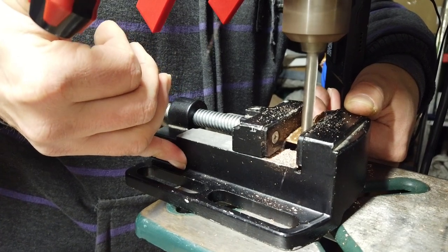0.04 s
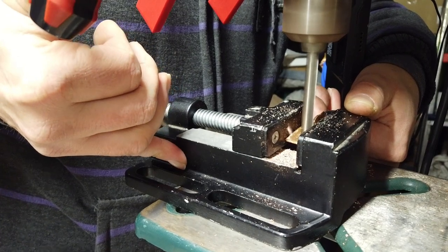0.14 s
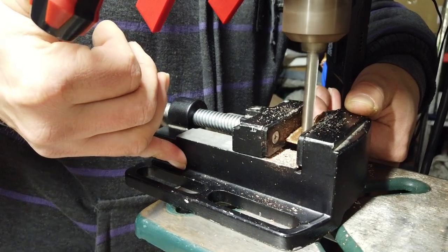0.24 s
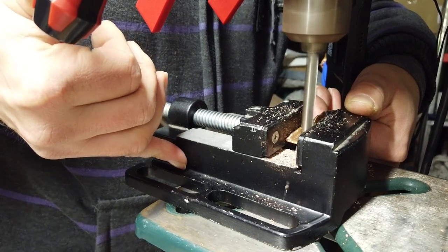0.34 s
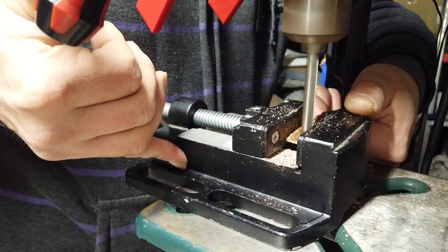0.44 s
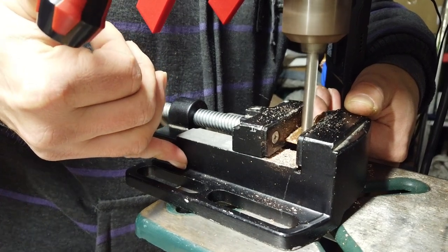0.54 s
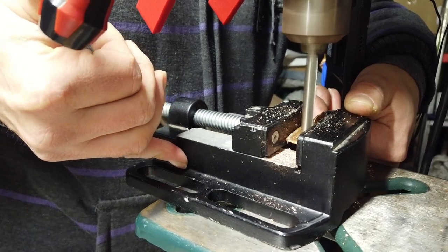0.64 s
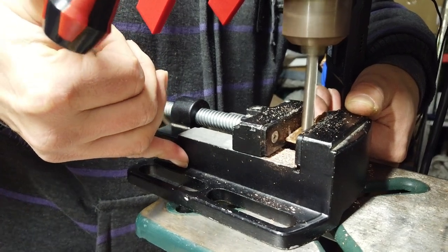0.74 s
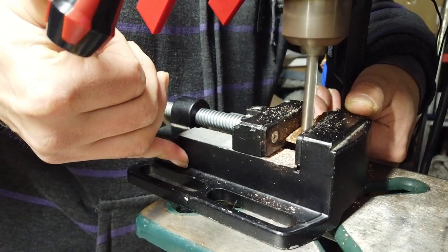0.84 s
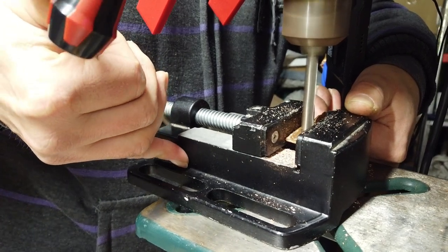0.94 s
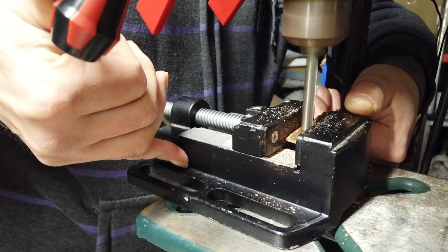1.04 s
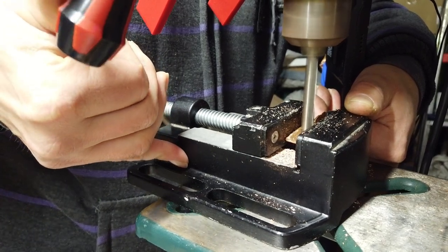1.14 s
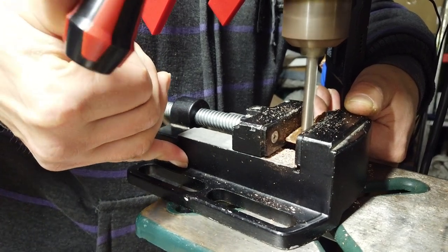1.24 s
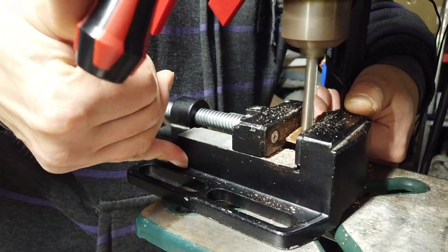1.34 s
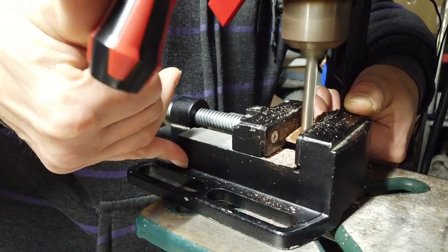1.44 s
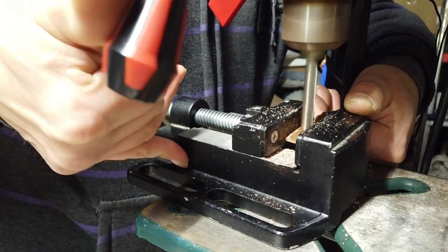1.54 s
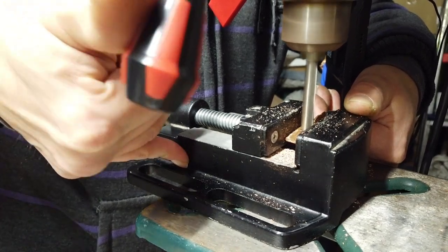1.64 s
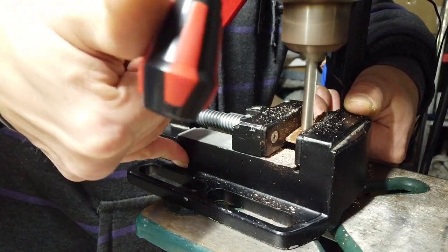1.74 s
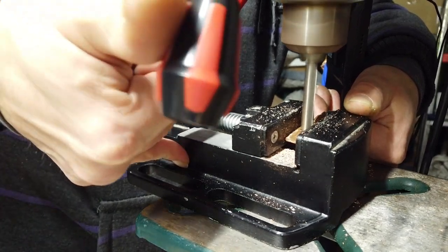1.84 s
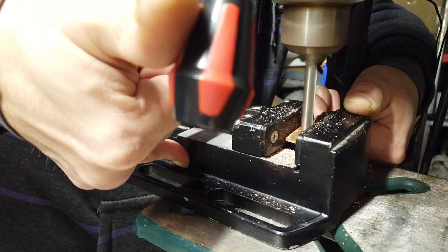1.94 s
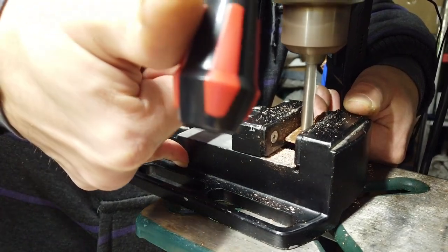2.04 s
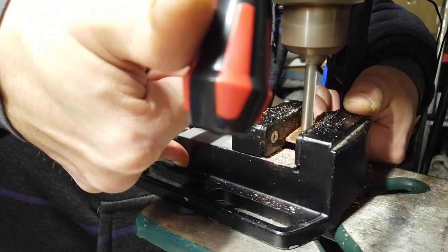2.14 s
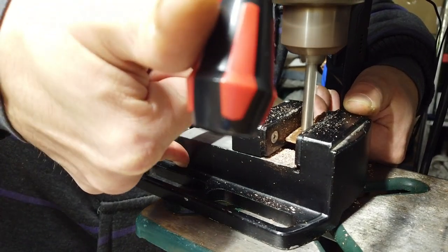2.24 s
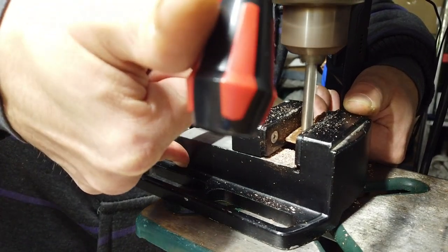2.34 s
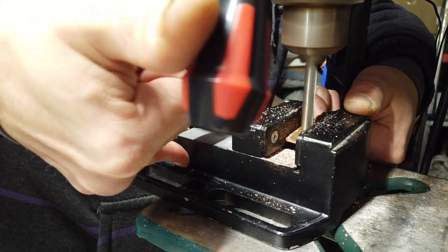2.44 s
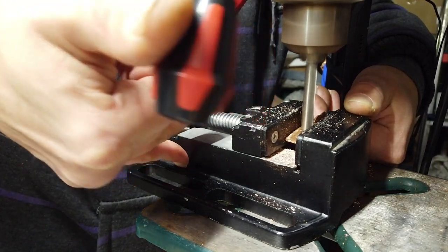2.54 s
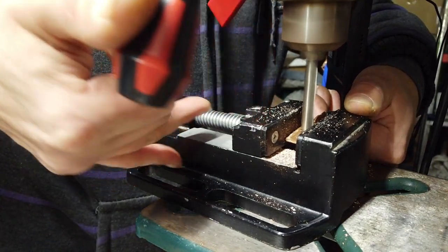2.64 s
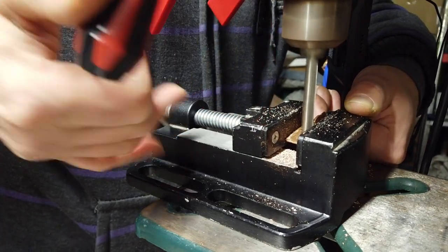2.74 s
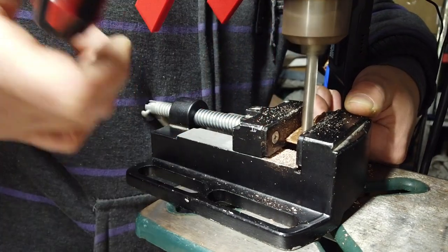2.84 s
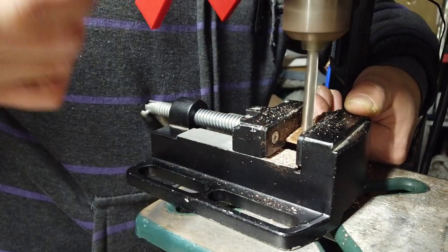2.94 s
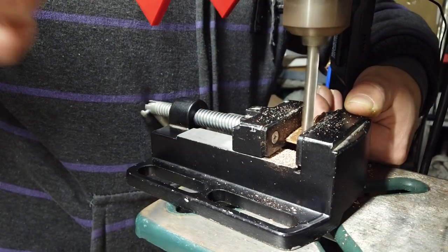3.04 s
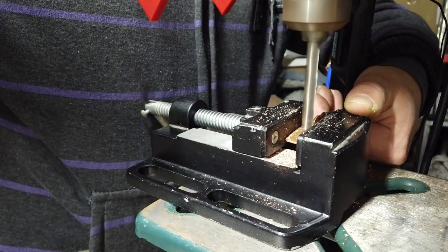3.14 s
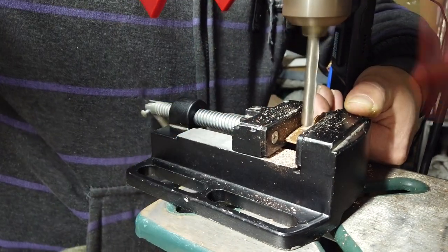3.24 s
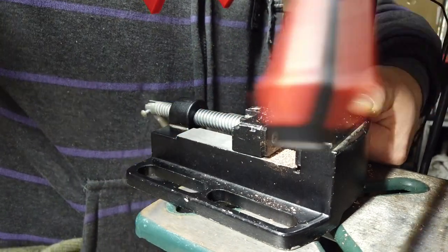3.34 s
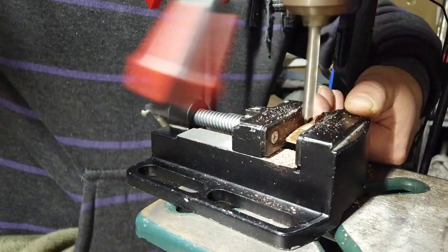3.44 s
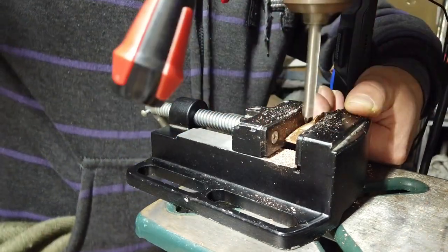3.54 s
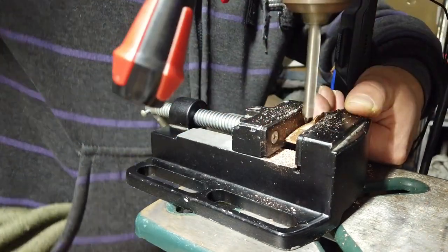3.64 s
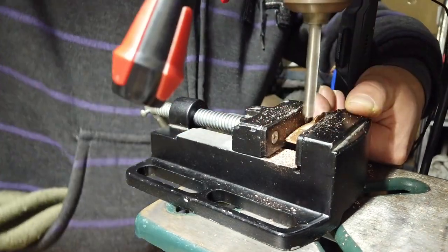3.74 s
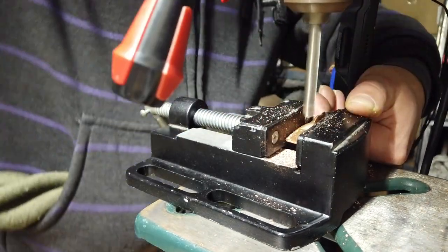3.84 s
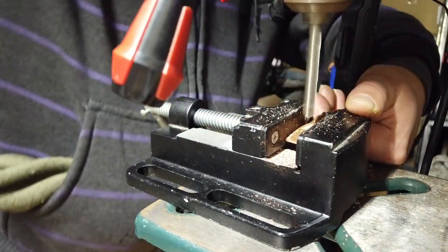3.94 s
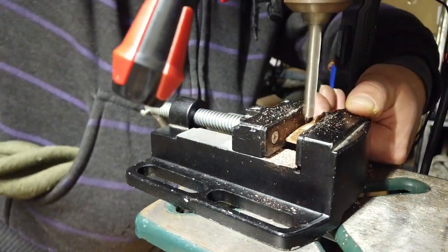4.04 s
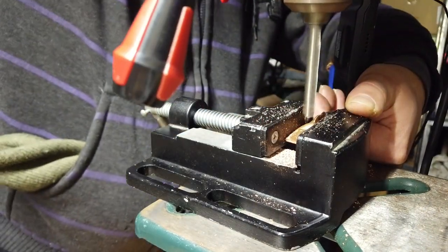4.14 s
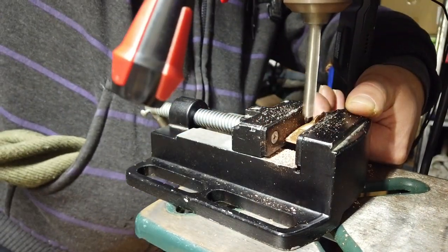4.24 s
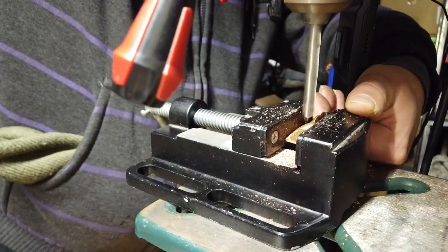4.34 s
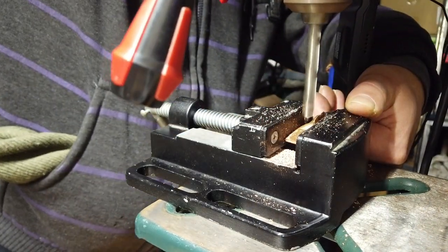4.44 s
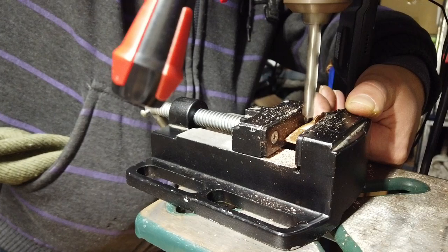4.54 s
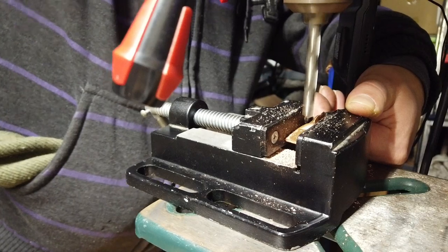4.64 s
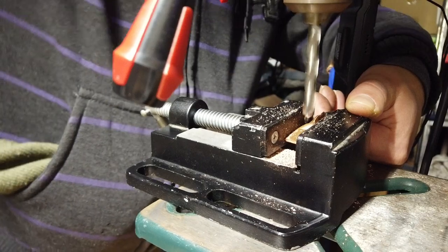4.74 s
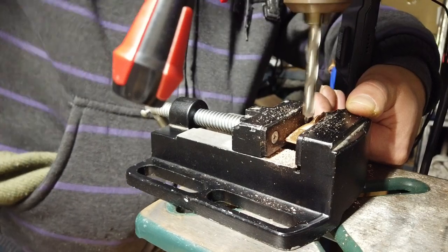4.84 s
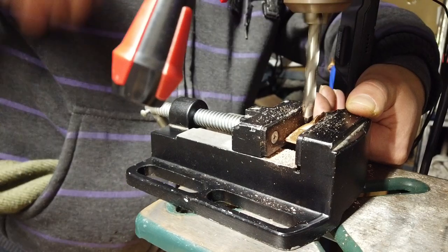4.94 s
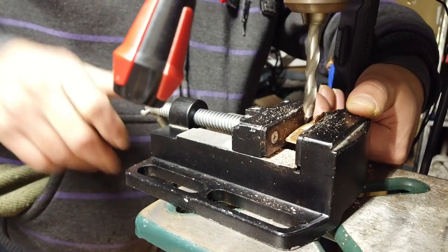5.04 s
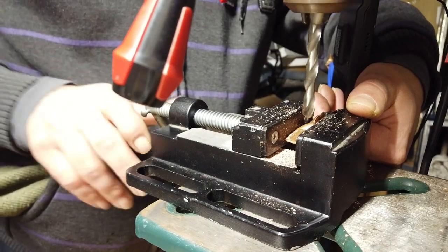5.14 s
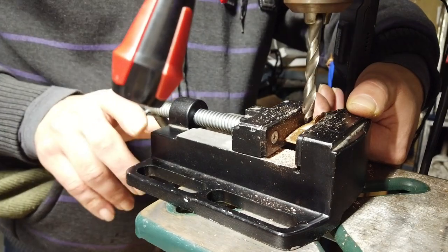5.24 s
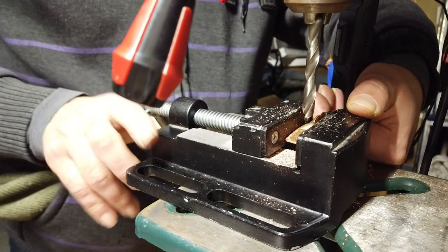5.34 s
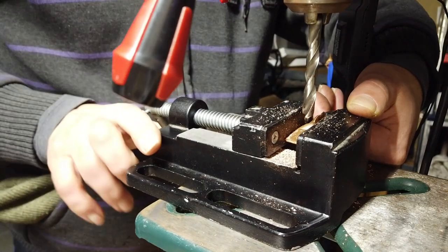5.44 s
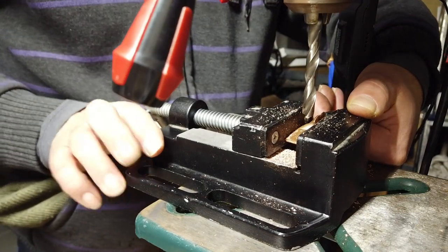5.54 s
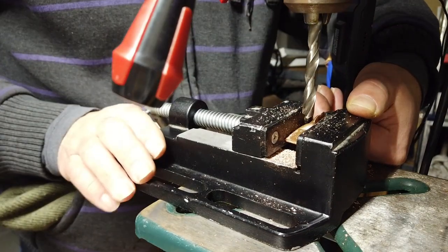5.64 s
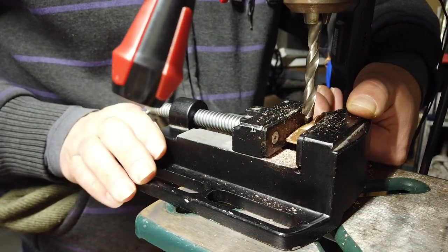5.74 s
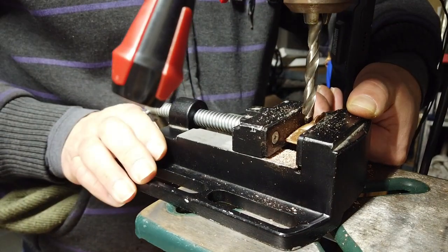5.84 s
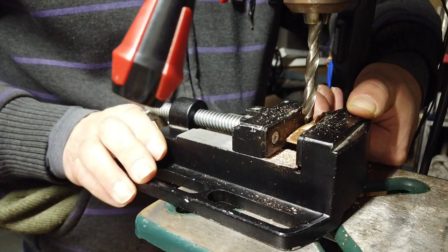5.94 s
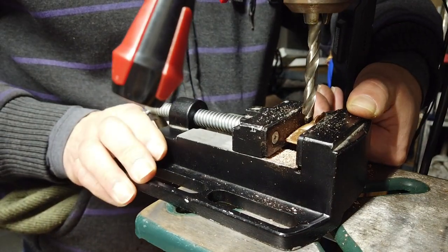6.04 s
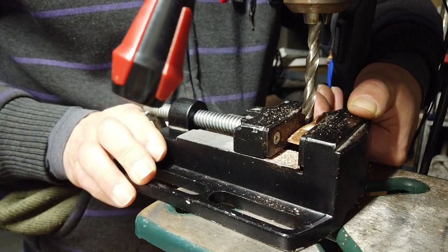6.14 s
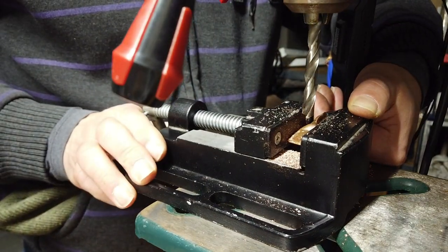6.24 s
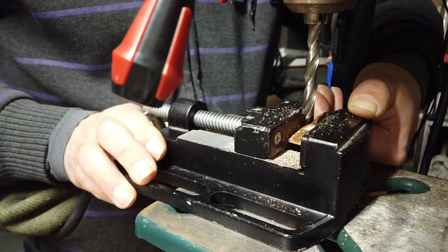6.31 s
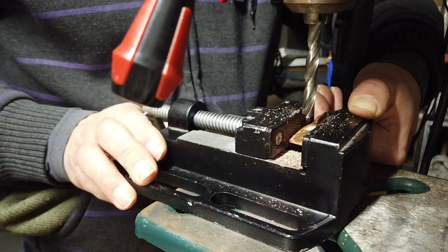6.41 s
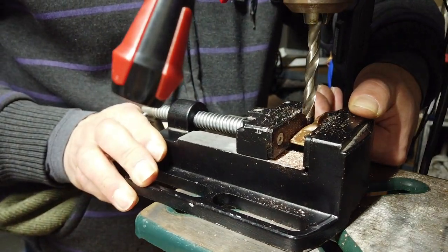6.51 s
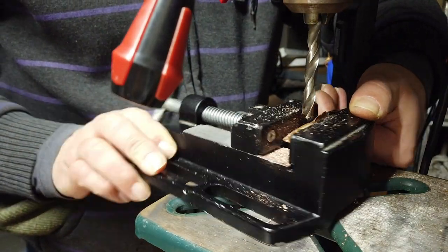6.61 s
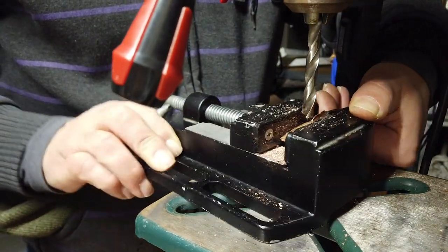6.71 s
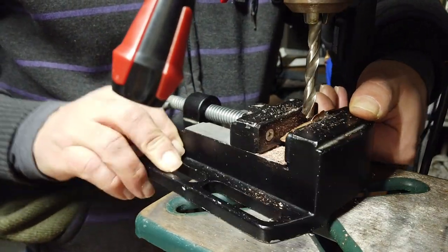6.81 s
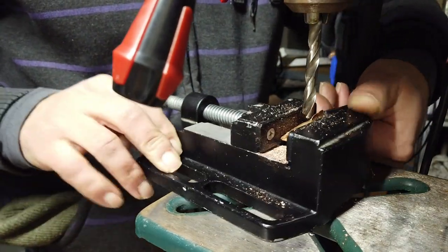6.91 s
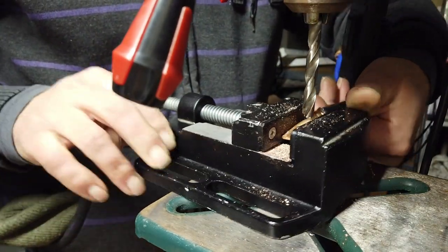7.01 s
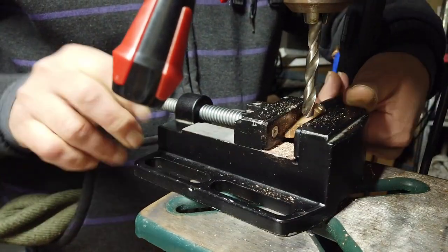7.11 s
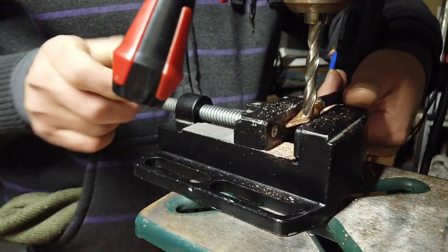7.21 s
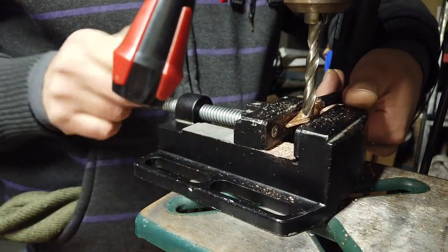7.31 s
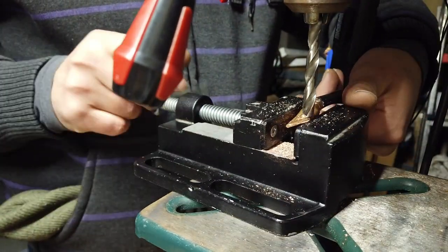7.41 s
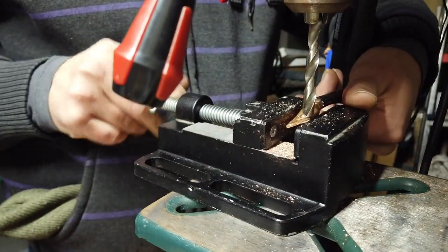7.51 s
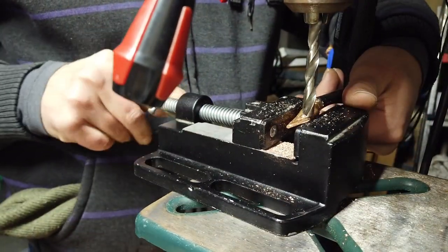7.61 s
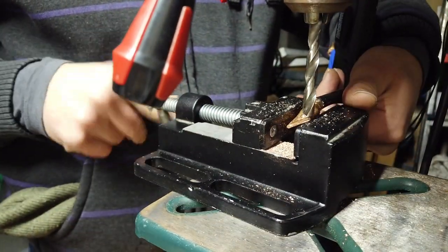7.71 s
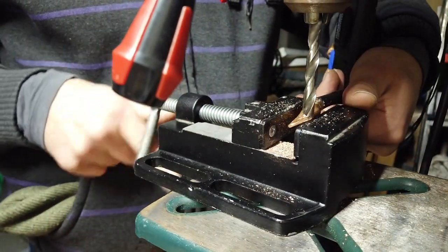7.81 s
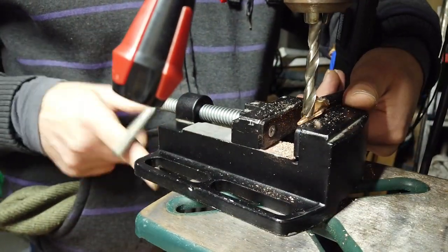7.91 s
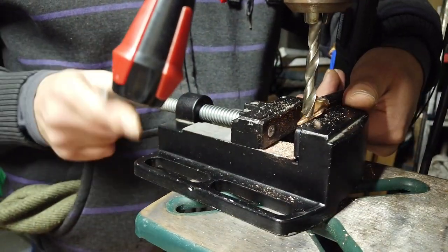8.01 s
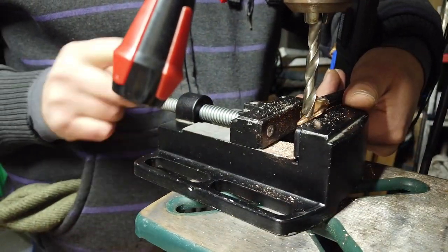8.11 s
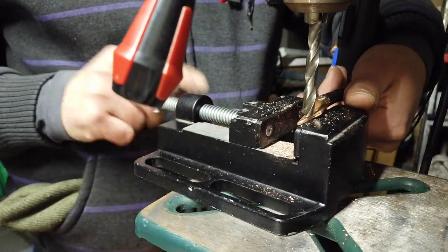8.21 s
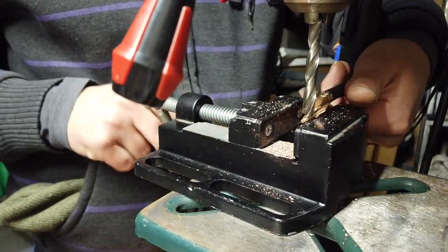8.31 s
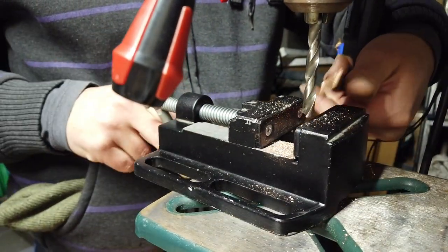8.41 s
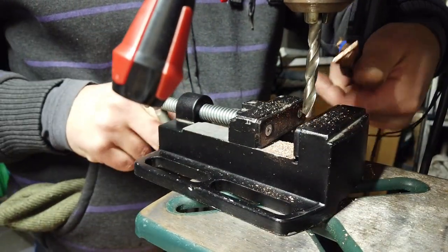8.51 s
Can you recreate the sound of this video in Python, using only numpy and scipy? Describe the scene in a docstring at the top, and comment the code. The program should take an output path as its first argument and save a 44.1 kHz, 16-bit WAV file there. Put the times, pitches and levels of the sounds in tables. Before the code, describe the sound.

A drill press rasps and squeals through copper, runs free and coasts down, then a metal vise is knocked, slid and wound with clinks.

```python
"""At a workshop bench, a drill press cuts through a copper part held in a vise, runs free, is
switched off and coasts to rest. The bit's two cutting edges, its lips, bite in turn: tearing metal
rasps and makes the bit, vise and part ring. Below that, the motor hums and its belt and bearings roar.
Then hands slide the vise, knock it on the table and wind its handle open, close by."""
import sys
import numpy as np
from scipy import signal
from scipy.io import wavfile
from scipy.ndimage import uniform_filter1d

SR = 44100
rng = np.random.default_rng(int(sys.argv[2]) if len(sys.argv) > 2 else 0)


def digitize_waveform(pressure):
    """Quantize a signal to 16-bit integers and store it at the path in sys.argv[1].

    Rows of a 2-D input are taken as channels; values are limited to [-1, 1].
    """
    field = np.atleast_2d(pressure).T
    bounded = np.clip(field, -1, 1)
    quanta = np.round(bounded * 32767).astype(np.int16)
    wavfile.write(sys.argv[1], SR, quanta)


N = 377937
T = np.arange(N) / SR
CUT_END = round(3.5 * SR)  # samples of cutting
OFF_S, REST_S = 4.44, 5.58  # the switch is thrown; the spindle stops

# Turns made by the spindle, the shaft that holds the bit; load slows it: time_s, turns
SPINDLE_TURNS = [(0, -.13), (.45, 11.97), (.8, 21.38), (1.5, 40.6), (2.1, 57.15), (2.6, 70.97),
                 (3.0, 82.17), (3.4, 93.4)]
# The machine's noise at full speed: time_s, roar_db, rumble_db
MOTOR_LEVELS = [(0.0, -47.5, -51), (0.4, -48, -63), (0.85, -47.5, -56.5), (1.1, -46.5, -64),
                (1.62, -53, -62.5), (2.0, -51, -61.5), (2.95, -48, -64.5), (3.15, -45, -63),
                (3.4, -43.5, -56), (3.55, -48, -74), (3.68, -44, -60), (4.14, -43, -60.5),
                (4.4, -43, -53.5)]
# The load shakes the bench, so left and right sound less alike: time_s, likeness_lost (0 to 1)
LOAD_SPREAD = [(0, .28), (2.95, .2), (3.2, .005)]
# The notes the iron vise rings at: pitch_hz, level_db, ring_s (time to fade by 60 dB)
VISE_NOTES = [(470, 8, .09), (690, 7, .1), (1170, 0, .08), (1430, 0, .06), (2000, -2, .06), (2420, -2, .1),
              (3016, -2, .1), (3450, -2, .12), (3640, -3, .14), (4240, -5, .08), (4850, -3, .09),
              (5630, -4, .08), (6050, -5, .05), (6900, -5, .05), (8610, -4, .06), (10380, -3, .1),
              (11250, -4, .08), (13400, -6, .05)]
# The vise bumps the table: start_s, body_db, thud_db, decay_s, pitch_hz
VISE_KNOCKS = [(6.217, -44, -46.5, 0.082, 1170), (6.404, -59, -57, 0.039, 688),
               (6.575, -57.5, -57.5, 0.066, 900), (6.702, -51, -68, 0.26, 690),
               (6.723, -32, -72, 0.079, 484), (6.742, -35, -62, 0.2, 786), (6.884, -48, -57, 0.093, 2070),
               (6.941, -49.5, -59, 0.045, 1430), (6.979, -49.5, -62, 0.07, 2000),
               (7.045, -58, -81, 0.31, 2420), (7.088, -54, -79, 0.18, 2430),
               (7.125, -47.5, -77, 0.22, 1270), (7.407, -61, -56.5, 0.48, 2100),
               (7.461, -46, -58, 0.085, 2920), (7.679, -55.5, -59, 0.076, 2420),
               (7.904, -59, -61, 0.046, 1430), (7.966, -48, -60, 0.15, 2700),
               (8.356, -53.5, -47.5, 0.088, 690)]
# Slack in the drive ticks, wider apart as it slows: start_s, body_db
DRIVE_TICKS = [(3.416, -41.5), (3.625, -38.5), (4.449, -58), (4.46, -38), (4.486, -45), (4.526, -44),
               (4.56, -44), (4.628, -53), (4.664, -58), (4.685, -42), (4.755, -44.5), (4.814, -46),
               (4.867, -50), (4.914, -42), (5.019, -46), (5.094, -61.5), (5.186, -48.5)]


def amp(db):
    """Turns decibels into a gain to multiply by."""
    return 10 ** (np.asarray(db) / 20)


def evened(x):
    """Scales a signal to an average (rms) level of 1."""
    return x / np.sqrt(np.mean(x ** 2) + 1e-20)


def wobble(span, length=N):
    """A random curve, smoothed over span samples."""
    return evened(uniform_filter1d(rng.standard_normal(length), size=span))


def at_pitch(points, hz):
    """Reads a table of (pitch_hz, value) between its rows."""
    pitches, values = np.transpose(points)
    return np.interp(np.log(hz + 1), np.log(pitches + 1), values)


def curves(rows):
    """A gate that shuts outside a table's time span, then its columns at every sample."""
    s, *columns = np.transpose(rows)
    gate = np.interp(T, [s[0] - .02, s[0], s[-1], s[-1] + .02], [0, 1, 1, 0])
    return gate, *(np.interp(T, s, column) for column in columns)


def swells(rows, rise_db_per_s, fall_db_per_s):
    """A gain that climbs to each (time_s, peak_db) and sinks after it."""
    slopes = [db - np.where(T < s, rise_db_per_s * (s - T), fall_db_per_s * (T - s)) for s, db in rows]
    return amp(np.max(slopes, axis=0))


def swings(rows, hz, ring_s):
    """A dying pure tone at each (start_s, level_db)."""
    t, kicks = np.arange(SR // 5) / SR, np.zeros(N)
    s, db = np.transpose(rows)
    kicks[np.round(s * SR).astype(int)] = amp(db)
    return signal.oaconvolve(kicks, amp(-60 * t / ring_s) * np.sin(2 * np.pi * hz * t))[:N]


def peaks(notes, db):
    """A gain by pitch, with a peak at each (pitch_hz, width_hz, level_db)."""
    return lambda hz: amp(db) * np.sqrt(
        sum(amp(2 * level) / (1 + (2 * (hz - pitch) / width) ** 2) for pitch, width, level in notes))


def iron(db):
    """The notes of the vise as peaks that colour whatever grates on it."""
    return peaks([(hz, 6 / ring_s, level) for hz, level, ring_s in VISE_NOTES], db)


def ring(x, notes):
    """Lets x shake notes (pitch_hz, width_hz, level_db); narrow ones ring longest."""
    out = 0
    for hz, width, db in notes:
        pole = np.exp((2j * np.pi * hz - np.pi * width) / SR)
        ringing = signal.lfilter([1], [1, -2 * pole.real, abs(pole) ** 2], x) * pole.imag
        out = out + amp(db) * np.sqrt(width) * ringing
    return evened(out)


def noise(colour=None, rings=None, patchy_db=0, apart=((0, 0),), size=1024):
    """Stereo noise at level 1, with drifting loud and soft patches; colour is its level by pitch."""
    # How alike left and right are: pitch_hz, likeness (0 to 1)
    likeness = [(60, 0.99), (950, 0.99), (2400, 0.81), (4500, 0.83), (8000, 0.35), (15000, .42)]
    # How far the left side is ahead: pitch_hz, lead_radians
    left_lead = [(2500, 0), (5000, 1.3), (16000, 1.5)]
    hop, hz = size // 2, np.fft.rfftfreq(size, 1 / SR)
    a, b, c, d, patches = rng.standard_normal((N // hop + 3, len(hz), 5), dtype=np.float32).T
    left, unrelated = a + 1j * b, c + 1j * d
    patches = evened(uniform_filter1d(uniform_filter1d(patches, size=8, axis=0), size=3, axis=1))
    lost = np.interp(np.arange(left.shape[1]) * hop / SR, *np.transpose(apart))
    same = np.clip(at_pitch(likeness, hz)[:, None] - lost, 0, 1)
    lag = np.exp(-1j * at_pitch(left_lead, hz))[:, None]
    right = same * left * lag + np.sqrt(1 - same ** 2) * unrelated
    gain = 1 if colour is None else amp(at_pitch(colour, hz))
    gain = gain * (1 + rings(hz) if rings else np.ones(len(hz)))
    bands = np.array([left, right]) * gain[:, None] * amp(patchy_db * patches)
    return evened(signal.istft(bands, window="cosine", nperseg=size, noverlap=hop)[1][:, :N])


def room_air():
    """The faint, steady rush of the room."""
    # Its colour: pitch_hz, level_db
    air_colour = [(12, -32), (20, -1), (56, 5), (96, -4.5), (134, -16), (204, -18), (897, -26.5),
                  (1610, -22), (2320, -27.5), (6180, -31.5), (16000, -33)]
    return amp(-74) * noise(air_colour, size=2048)


def room_echoes(x):
    """The workshop throws back scattered echoes; high pitches die first."""
    # Time for an echo to fade by 60 dB: pitch_hz, fade_s
    fade_times = [(200, .28), (1000, .24), (4000, .16), (12000, .12)]
    echoes, slots = np.zeros((2, SR // 2)), np.arange(200, SR // 2 - 20, 20)
    arrivals = slots + rng.integers(0, 20, (2, len(slots)))
    np.put_along_axis(echoes, arrivals, rng.choice([-1., 1.], arrivals.shape), 1)
    hz, t, bands = signal.stft(echoes, SR, nperseg=256)
    tail = signal.istft(bands * amp(-60 * t / at_pitch(fade_times, hz)[:, None]), SR, nperseg=256)[1]
    tail = tail + 0.41 * tail[::-1]  # each side gets some of the other
    return signal.fftconvolve(x, tail / np.linalg.norm(tail[0]), axes=1)[:, :N]


def coasting(drop_db, fade):
    """Gain of a turning part: full under power, then a quick drop and a fade with the speed."""
    speed = np.interp(T, [OFF_S, REST_S], [1, 0])
    return amp(np.interp(T, [OFF_S, OFF_S + 0.17], [0, drop_db])) * speed ** fade


def motor_roar():
    """Belt and bearings roar in the frame and the bench rumbles; both fade as the drive slows."""
    # The roar while the tip presses hard: pitch_hz, level_db
    strained_colour = [(88, -32), (150, -0.5), (200, -16), (301, -0.5), (366, -9.5), (625, -0.5),
                       (1130, -10.5), (1310, -2.5), (2300, -7.5), (2990, -30), (5060, -120)]
    # The roar once the load eases: pitch_hz, level_db
    easy_colour = [(88, -42), (150, -13.5), (413, -8.5), (500, -2), (562, -3), (623, -4), (1140, -15.5),
                   (1320, -14.5), (1620, -11), (2550, -6.5), (5000, -26), (6500, -56.5), (11000, -120)]
    # Notes of the frame: pitch_hz, width_hz, level_db
    frame_notes = [(621, 19, 6.5), (807, 53, 6), (1041.5, 21, 12), (1307, 55, 12.5), (2470, 170, -4.5)]
    # Note of the upright column: pitch_hz, width_hz, level_db
    column_note = [(788, 9.7, 0)]
    # The bench's rumble: pitch_hz, level_db
    rumble_colour = [(12, -40.5), (20, -2), (59, -6), (118, -3.5), (161, 13.5), (259, -41), (300, 9),
                     (390, -24), (660, -120)]
    _, roar_db, rumble_db = curves(MOTOR_LEVELS)
    eased = np.interp(T, [.8, 1.4], [0, np.pi / 2])
    roar = np.sin(eased) * noise(easy_colour, peaks(frame_notes, db=8), patchy_db=2, apart=LOAD_SPREAD)
    roar += np.cos(eased) * noise(strained_colour, patchy_db=2.5, apart=LOAD_SPREAD)
    dull = signal.sosfilt(signal.butter(2, 1793, fs=SR, output="sos"), roar)
    roar += (dull - roar) * (1 - coasting(drop_db=-0.76, fade=1.1))  # the treble dies faster
    roar += amp(-16.5) * ring(roar, column_note)
    rumble = noise(rumble_colour, patchy_db=3, apart=LOAD_SPREAD, size=2048)
    return coasting(drop_db=-3, fade=2.02) * (amp(roar_db) * roar + amp(rumble_db) * rumble)


def column_groans():
    """The drill's column groans in short swells of two clashing tones."""
    # Each groan: peak_s, level_db, pitch_hz
    groans = [(0.78, -57, 776), (2.585, -47, 770), (3.155, -47.5, 782), (3.34, -44.5, 768),
              (3.39, -43, 786), (3.44, -44, 729), (4.14, -59, 757), (4.36, -42, 785)]
    s, db, hz = np.transpose(groans)
    phase = 2 * np.pi * np.cumsum(np.interp(T, s, hz)) / SR
    tones = np.sqrt(2) * (np.sin(phase) + 0.37 * np.sin(1.32 * phase))
    return swells(zip(s, db), rise_db_per_s=410, fall_db_per_s=350) * tones


def belt_hiss():
    """Once the bit leaves the work, belt and bearings hiss freely."""
    # The hiss: pitch_hz, level_db
    hiss_colour = [(2060, -2), (3500, 2), (5360, -2), (9200, -3), (10100, -4.5), (13100, -15), (15100, -22),
                   (16000, -26)]
    # Faint notes of the free bit and the chuck that grips it: pitch_hz, width_hz, level_db
    chuck_notes = [(5000, 46, -4.5), (7830, 53, 5), (8500, 120, -12.5), (9800, 48, 5), (10040, 43, -8),
                   (12100, 51, -10)]
    lift_s = 3.0
    free = np.interp(T, [lift_s - .03, lift_s], [0, 1]) * coasting(drop_db=-6.5, fade=2.4)
    hiss = noise(hiss_colour, peaks(chuck_notes, db=2), patchy_db=2.5, size=512)
    return free * amp(-54 + 2.37 * wobble(150)) * hiss


def mains_hum():
    """The mains current makes the motor's coils hum."""
    # The whole hum: time_s, level_db
    hum_levels = [(0, -62), (.97, -62), (1.01, -52), (1.7, -53.5), (2.1, -55), (2.7, -55), (3.39, -50.5),
                  (4.11, -49), (4.46, -52.5), (4.6, -62)]
    # Its tones: pitch_hz, relative_db
    hum_tones = [(200, -14), (300.3, -16), (350, -15), (400, -16), (500.3, 0)]
    gate, hum_db = curves(hum_levels)
    hum = sum(amp(db) * np.sin(2 * np.pi * (hz * T + rng.random())) for hz, db in hum_tones)
    return np.sqrt(2) * gate * amp(hum_db) * hum


def spindle_shake():
    """The unbalanced spindle shakes the bench at three low, steady pitches."""
    # About one, three and four shakes a turn at full speed: pitch_hz
    pitches = [28.5, 83.3, 107]
    # Their strengths: time_s, low_db, middle_db, high_db
    levels = [(0.0, -69.5, -56.5, -65), (0.29, -57, -66, -58.5), (0.58, -90, -55, -53),
              (0.71, -73, -78, -65), (0.91, -46.5, -55, -56), (1.07, -67, -101, -89),
              (2.85, -91.5, -81.5, -77.5), (4.21, -69, -50.5, -65), (4.44, -82, -55, -85),
              (4.77, -64, -77, -83), (5.2, -71, -69, -83)]
    # How far the right side trails in each: lag_radians
    lags = [1.7, .15, .7]
    gate, *shake_db = curves(levels)
    shake = sum(amp(db) * np.sin(2 * np.pi * (hz * T + rng.random()) - np.array([[0], [lag]]))
                for hz, db, lag in zip(pitches, shake_db, lags))
    return np.sqrt(2) * gate * shake


def vise_scrape():
    """Iron rubs on iron as the vise slides and its screw turns."""
    # The scrape below and above 4 kHz: time_s, dull_db, bright_db
    scrape_levels = [(5.5, -86, -88.5), (6.05, -86.5, -97.5), (6.55, -83, -93), (6.69, -78, -87),
                     (6.82, -63.5, -82), (6.92, -68, -89), (7.09, -67.5, -70), (7.21, -66, -64),
                     (7.31, -67.5, -82), (7.53, -61.5, -78), (7.66, -72.5, -87.5), (7.88, -69, -85),
                     (8.05, -66.5, -77.5), (8.2, -66, -77), (8.31, -58.5, -79), (8.43, -58.5, -67.5),
                     (8.57, -63.5, -79)]
    # Its colour: pitch_hz, level_db
    scrape_colour = [(71, -26), (120, 16.5), (385, 1), (684, -5.5), (839, 8), (1210, -0.5), (2640, -6),
                     (3380, -10.5), (7350, -21.5), (10600, -23), (16000, -42)]
    gate, dull_db, bright_db = curves(scrape_levels)
    grit = amp(2.5 * wobble(500))
    scrape = noise(scrape_colour, iron(db=11), patchy_db=1.8)
    dull, bright = (evened(signal.sosfilt(signal.butter(4, 4000, kind, fs=SR, output="sos"), scrape))
                    for kind in ("low", "high"))
    return gate * grit * (amp(dull_db) * dull + amp(bright_db) * bright)


def bench_thumps():
    """The bench thumps at its own low note as the vise is handled."""
    # Each thump: peak_s, level_db
    thumps = [(5.85, -69.5), (6.57, -80), (6.77, -46), (7.03, -56), (7.51, -47.5), (7.87, -58), (8.14, -59),
              (8.36, -56)]
    boom = noise(colour=[(40, -50), (68, -16), (76, 11), (85, -10), (130, -64), (400, -88)], size=4096)
    return swells(thumps, rise_db_per_s=194, fall_db_per_s=140) * boom


def blows(rows):
    """Each blow is three dying bursts of noise and a ring of the vise, damped by hands and jaws.
    Rows: start_s, body_db, thud_db, fizz_db, decay_s, ring_db (above the body), pitch_hz."""
    # The low burst: pitch_hz, level_db
    thud = [(24, -35), (40, 2), (97, 2), (183, -6.5), (212, -9.5), (386, -11), (600, -21.5), (780, -35),
            (1320, -120)]
    # The middle burst: pitch_hz, level_db
    body = [(240, -5.5), (400, -18), (713, -6.5), (1000, -2), (1170, -3.5), (1310, -4.5), (2420, -3),
            (4730, -13.5), (6000, -19.5), (7800, -44.5), (13200, -120)]
    # The high burst: pitch_hz, level_db
    fizz = [(2060, -24), (3500, -8.5), (5330, -11.5), (8530, -2.5), (11000, 4.5), (11900, -6.5),
            (15500, -3), (16000, -28.5)]
    t = np.arange(SR // 5) / SR
    strength, ringing = np.zeros((3, N + SR)), np.zeros((2, N + SR))
    rattle = amp(2.5 * wobble(90, N + SR) - 1)  # loose parts chatter
    chance = rng.standard_normal((len(rows), len(VISE_NOTES), 2))
    hz, note_db, ring_s = np.transpose(VISE_NOTES)[:, :, None]
    notes = amp(note_db - 60 * t / ring_s) * np.sin(2 * np.pi * hz * t) * (1 - np.exp(-t / 0.0035))
    for (s, body_db, thud_db, fizz_db, decay_s, ring_db, pitch_hz), luck in zip(rows, chance):
        span = slice(round(s * SR), round(s * SR) + len(t))
        age = t / decay_s
        shapes = [(thud_db, 1.8, .04), (body_db, 1.05, .025), (fizz_db, .7, .03)]
        for band, (db, fall, rise) in enumerate(shapes):
            strength[band, span] += amp(db - 60 * age / fall) * (1 - np.exp(-age / rise))
        octaves_away = abs(np.log2(hz / pitch_hz))  # the spot struck favours notes near pitch_hz
        favour = amp(2.5 * luck[:, :1] - 28 * np.minimum(octaves_away / .6, 1))
        sides = 1 + 0.419 * luck[:, 1:] * [1, -1]
        damping = amp(-60 * age / 3)
        ringing[:, span] += amp(body_db + ring_db) * damping * rattle[span] * ((favour * sides).T @ notes)
    bursts = sum(gain[:N] * noise(colour, iron(db=12), size=512)
                 for gain, colour in zip(strength, [thud, body, fizz]))
    return ringing[:, :N] + bursts


def handle_clinks():
    """Rows for blows(): the steel handle clinks in its screw."""
    # Each clink: start_s, body_db, fizz_db, pitch_hz
    clinks = [(5.367, -62.5, -89, 2840), (5.634, -68.5, -69, 1520), (5.654, -69.5, -76, 3016),
              (5.683, -67, -77, 1460), (6.809, -48, -29.5, 11300), (6.852, -46.5, -48, 3180),
              (7.17, -54, -64, 2380), (7.207, -43.5, -46.5, 11800), (7.218, -39.5, -64, 1170),
              (7.247, -55, -47, 2000), (7.259, -61, -49, 3660), (7.267, -46.5, -44, 4770),
              (7.312, -49.5, -58, 2250), (7.436, -44, -46, 6400), (7.58, -54, -68, 3570),
              (7.615, -68, -85.5, 2700), (7.871, -53.5, -79, 1480), (7.99, -55.5, -62, 3450),
              (8.091, -71, -62, 4100), (8.104, -59.5, -60, 2840), (8.149, -48.5, -53, 5960),
              (8.2, -60, -57.5, 2940), (8.29, -59, -79, 2980), (8.338, -48, -59, 4670),
              (8.415, -46, -52, 3460), (8.473, -59, -71, 3020), (8.513, -50.5, -52, 4150)]
    decay_s, ring_db = .075, 9
    return [(s, db, db - 20, fizz_db, decay_s, ring_db, hz) for s, db, fizz_db, hz in clinks]


def vise_knocks():
    """Rows for blows(): the harder the vise hits the table, the brighter the knock."""
    return [(s, db, thud_db, db - 21 + .8 * (db + 45), decay_s, 0, hz)
            for s, db, thud_db, decay_s, hz in VISE_KNOCKS]


def drive_ticks():
    """Rows for blows(): the slack drive ticks, ever duller after the switch is thrown."""
    dulling_db_per_s, decay_s, ring_db, pitch_hz = 26, .07, -22, 1317
    return [(s, db, db - 5, db - 1 - dulling_db_per_s * max(s - OFF_S, 0), decay_s, ring_db, pitch_hz)
            for s, db in DRIVE_TICKS]


def lip_jams():
    """Rows for blows(): the lips jam at the rim of the hole and jolt the vise."""
    # Each jam: start_s, body_db
    jams = [(0.857, -29), (0.892, -31.5), (0.931, -37.5), (0.964, -40), (1.007, -35), (1.044, -39),
            (1.11, -29.5), (1.18, -32), (1.216, -28.5), (1.257, -31)]
    decay_s, ring_db, pitch_hz = .035, 1, 1900
    return [(s, db, db - 14, db + 2, decay_s, ring_db, pitch_hz) for s, db in jams]


def chip_snags():
    """Rows for blows(): a chip of copper snags on a lip with a bright click."""
    # Each snag: start_s, fizz_db, pitch_hz
    snags = [(0.017, -21, 2960), (0.063, -21.5, 2570), (0.2, -25, 2710), (0.237, -21, 2710),
             (0.302, -24, 2710), (0.388, -24, 2560), (0.413, -20, 2550), (0.429, -24, 2760),
             (0.58, -29, 2760), (0.644, -19, 2760), (0.719, -21, 2915), (0.765, -24, 2994),
             (0.83, -17.5, 2944), (1.459, -38.5, 3330), (1.621, -22.5, 3320), (1.967, -22.5, 2880),
             (2.003, -24, 2950), (2.038, -35.5, 3350), (2.076, -22.5, 3330), (2.111, -20.5, 2920),
             (2.136, -22, 4900), (2.203, -20, 4850), (2.328, -21.5, 6550), (2.363, -35.5, 2940),
             (2.425, -21.5, 4730), (2.675, -21, 4810), (2.951, -20.5, 2520), (2.974, -25, 6090),
             (3.007, -23.5, 2950), (3.062, -31, 2480)]
    decay_s, ring_db = .031, 4.5
    return [(s, db - 30, db - 29, db, decay_s, ring_db, hz) for s, db, hz in snags]


def bites(depth, short_lip):
    """The cutting force: each lip catches, tears for a moment and slips free; one lip is shorter."""
    through_s = .83  # the tip breaks through: three chatters a turn give way to two bites
    count = np.interp(T, *np.transpose(SPINDLE_TURNS)) * np.where(T < through_s, 3, 2)
    number, progress = np.floor(count).astype(int), count % 1
    size = np.clip(1 + .12 * rng.standard_normal(400), 0, 3)[number % 400]
    size *= 1 - short_lip * ((number + 1) % 2)
    catch = .72 * size * (1 - np.exp(-progress / .12)) * np.exp(-(progress / .25) ** 2)
    force = amp(depth * catch + wobble(120))
    return force / np.sqrt(uniform_filter1d(force ** 2, size=4000))


def vise_growl(jolts):
    """The jolted vise growls lower under the pressing tip than under the lips."""
    # Its notes under the tip: pitch_hz, width_hz, level_db
    tip_notes = [(2604, 55, 2.5), (2766, 70, -11), (2816, 190, 6.5), (3580, 120, 0.5)]
    # Its notes under the lips: pitch_hz, width_hz, level_db
    lip_notes = [(2622, 80, -8.5), (2954, 60, -1.5), (3340, 86, 2), (3720, 78, -0.5)]
    deeper = np.interp(T[:CUT_END], [.9, 1.3], [0, np.pi / 2])
    return np.cos(deeper) * ring(jolts, tip_notes) + np.sin(deeper) * ring(jolts, lip_notes)


def part_chirps(jolts):
    """A kick in every turn makes the part chirp, lower once the lips cut the rim; jolts ring it too."""
    # The high and low chirp: pitch_hz, width_hz, place_in_turn (0 to 1)
    chirp_notes = [(6060, 170, 0.65), (4866, 100, .03)]
    # Their blend: time_s, blend_radians (0 = high only, 1.57 = low only)
    chirp_blend = [(1.6, .25), (2.1, 1.25), (2.45, 1.15), (2.6, .6)]
    turns, chirps = np.interp(T[:CUT_END], *np.transpose(SPINDLE_TURNS)), []
    for hz, width, place in chirp_notes:
        kicks = np.diff(np.floor(turns - place), prepend=-1) * amp(4 * rng.standard_normal(CUT_END))
        kicks = np.array([kicks, np.roll(kicks, 2)])  # the right side is two samples late
        once = ring(kicks, [(hz, width, 0)])
        chirps.append(ring(once, [(hz * 1.01, width, 0)]))  # ringing twice makes it swell
    blend = np.interp(T[:CUT_END], *np.transpose(chirp_blend))
    kicked = np.cos(blend) * chirps[0] + np.sin(blend) * chirps[1]
    return .85 * kicked + .5 * ring(jolts, [(hz, width, 0) for hz, width, _ in chirp_notes])


def bit_squeal(tearing):
    """The bit rings near 10 kHz: a flickering blur that clears while the rim of the hole grips it."""
    # The blurred ring: pitch_hz, width_hz, level_db
    blurred_notes = [(9850, 120, -6), (10120, 120, -1), (10390, 100, 0), (10500, 50, -4), (10750, 120, -5)]
    # The clear squeal: pitch_hz, width_hz, level_db
    clear_notes = [(9840, 55, -10), (10120, 35, 0), (10370, 70, -7), (10700, 90, -13)]
    # It starts high and settles: time_s, extra_pitch_hz
    settling = [(.85, 330.5), (.96, 221.5), (1.02, 0)]
    extra_hz = np.interp(T[:CUT_END], *np.transpose(settling))
    pitch_shift = np.exp(2j * np.pi * np.cumsum(extra_hz) / SR)
    clear = (pitch_shift * signal.hilbert(ring(tearing, clear_notes))).real
    grip = np.interp(T[:CUT_END], [.83, .86, 1.3, 1.42], [0, np.pi / 2, np.pi / 2, 0])
    flicker_db = 1.5 * evened(uniform_filter1d(wobble(900, CUT_END), size=900))
    return amp(flicker_db) * (np.cos(grip) * ring(tearing, blurred_notes) + np.sin(grip) * clear)


def cutting():
    """Copper rasps as each bite tears it, ringing the bit and shaking the vise and the part."""
    # The cut: time_s, rasp_db, growl_db, squeal_db, chirp_db (these three above the rasp), bite_depth
    cut_levels = [(0.0, -40, -4, -7, -14, 7.9), (0.4, -40.5, -4.5, -3.5, -19, 11),
                  (0.82, -42.5, -4.5, 1.5, -20, 9.3), (0.85, -43, -4, 14, -13, 8),
                  (1.15, -40.5, -7.5, 9.5, -9.5, 3.5), (1.29, -38.5, -9.5, 8, -8.5, 5),
                  (1.35, -36, -9.5, -1.5, -11, 9.5), (1.58, -39, -7.5, -0.5, -14, 15.3),
                  (1.75, -35, -9, -1, -14, 14), (2.32, -37, -6, -0.5, -8, 15), (2.6, -37, -22, -6, -6, 11),
                  (2.94, -43, -5.5, 1.2, -6, 10.7), (3.16, -63, 6.5, 5.5, -3, 11),
                  (3.45, -90, 26, 9, 19, 8.5)]
    # The rasp: pitch_hz, level_db
    rasp_colour = [(880, -53), (1500, -24.5), (3310, -3.5), (4370, -10.5), (4870, -3.5), (5600, -9),
                   (6000, -3), (7320, -5.5), (10200, -3), (16000, -14)]
    # Notes of the bit: pitch_hz, width_hz, level_db
    bit_notes = [(6890, 200, -13), (8100, 69, -3), (11550, 300, -4), (12060, 160, 3), (12600, 79, -6),
                 (13900, 300, 0)]
    gate, rasp_db, growl_db, squeal_db, chirp_db, depth = curves(cut_levels)
    force = bites(2 * depth, short_lip=.25)
    tearing = (force * noise(patchy_db=1.5, size=512))[:, :CUT_END]
    jolts = (bites(2.5 * depth, short_lip=.4) * noise(patchy_db=.5, size=512))[:, :CUT_END]
    cut = (force * noise(rasp_colour, patchy_db=3, size=512))[:, :CUT_END]
    cut += amp(-4.5) * ring(tearing, bit_notes)
    cut += amp(growl_db[:CUT_END]) * vise_growl(jolts)
    cut += amp(squeal_db[:CUT_END]) * bit_squeal(tearing)
    cut += amp(chirp_db[:CUT_END]) * part_chirps(jolts)
    return gate * amp(rasp_db) * np.pad(cut, ((0, 0), (0, N - CUT_END)))


def scene():
    """Adds up the drill, the handling and the room; only the hits echo."""
    frame_pings = swings([(s, db - 2) for s, db in DRIVE_TICKS], hz=1330, ring_s=.072)
    table_swings = swings([(s, thud_db + 4) for s, _, thud_db, *_ in VISE_KNOCKS], hz=109, ring_s=.053)
    hits = blows(chip_snags() + handle_clinks() + vise_knocks() + lip_jams() + drive_ticks())
    hits += frame_pings + table_swings
    echoes = amp(-13) * room_echoes(hits)
    drill = cutting() + motor_roar() + column_groans() + belt_hiss() + mains_hum() + spindle_shake()
    return drill + vise_scrape() + bench_thumps() + hits + echoes + room_air()


def record(dry):
    """Cuts away the very highest treble."""
    edge_hz = 15900
    return signal.oaconvolve(dry, signal.firwin(511, edge_hz, window=("kaiser", 9), fs=SR)[None], "same")


dry = scene()
out = record(dry)
digitize_waveform(out)
```